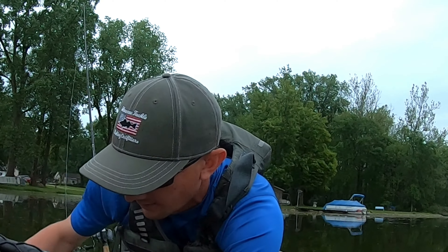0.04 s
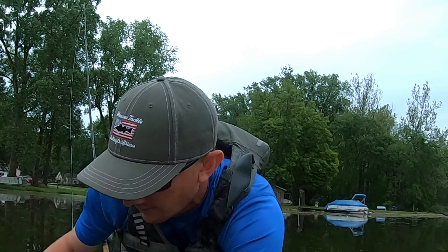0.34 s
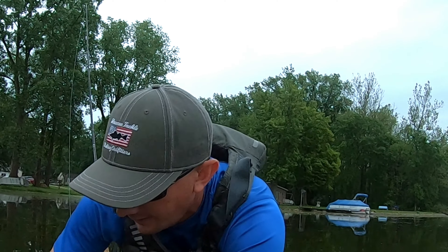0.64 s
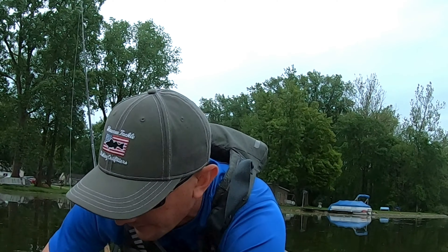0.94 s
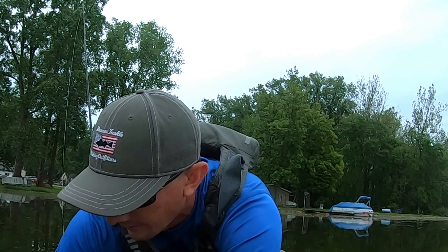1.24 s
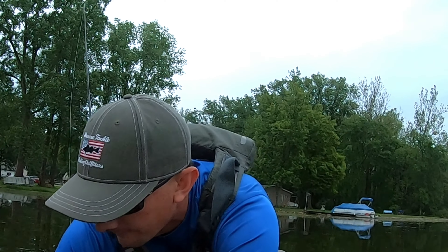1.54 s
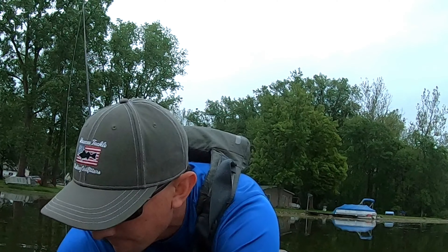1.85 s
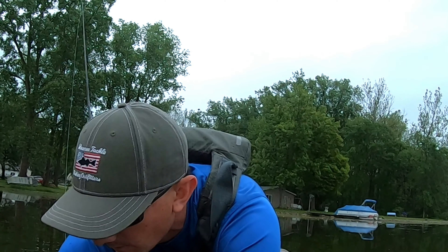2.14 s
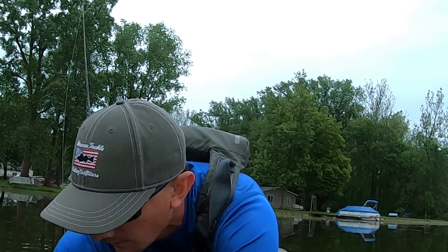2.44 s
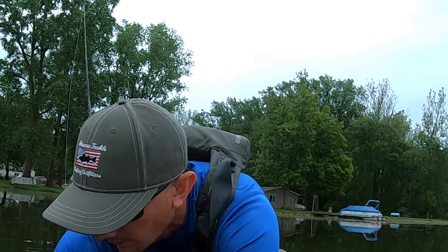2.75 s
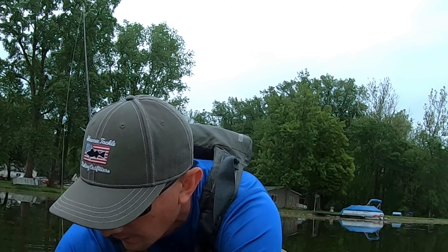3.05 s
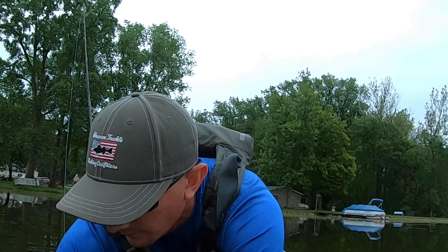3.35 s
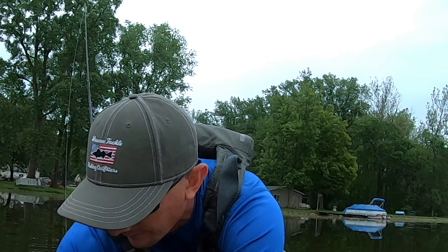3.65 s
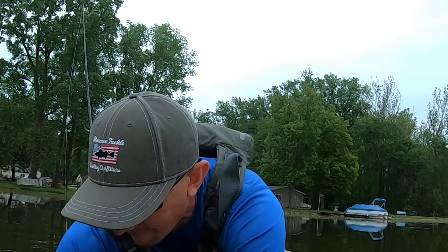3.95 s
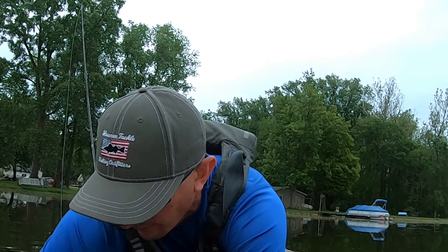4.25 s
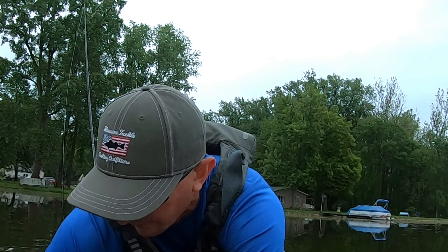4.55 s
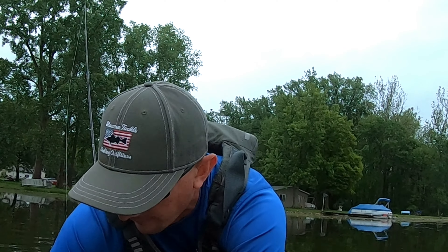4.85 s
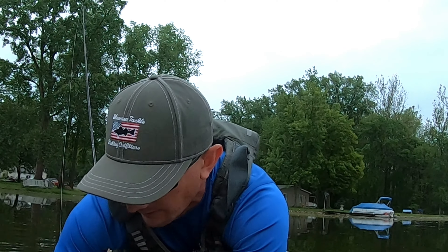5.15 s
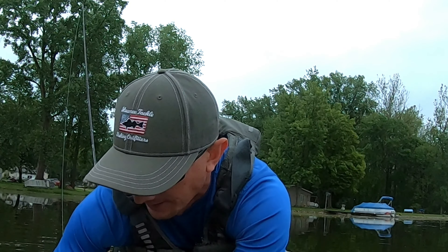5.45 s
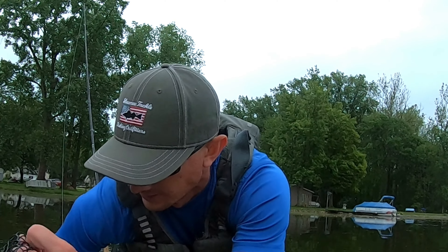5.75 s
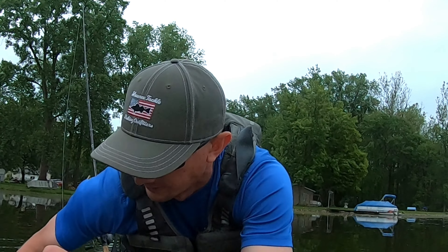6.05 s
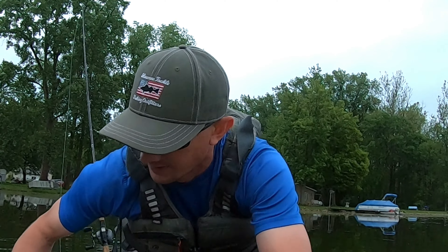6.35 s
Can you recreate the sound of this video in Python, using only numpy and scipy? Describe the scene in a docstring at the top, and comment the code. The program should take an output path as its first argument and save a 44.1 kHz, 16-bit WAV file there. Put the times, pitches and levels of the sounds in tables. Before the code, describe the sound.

A landing net bumps a plastic kayak with a hollow knock that shakes the microphone, and a fish splashes in the mesh. Water drips off while small birds chirp on the bank of a calm lake. The fish thrashes again amid more knocks, a bird trills, and a last few knocks come at the end. The boat and water are close, over a faint low drone.

```python
"""A fish is handled in a rubber landing net beside a plastic kayak on a calm lake, over a low far drone.
First the net frame knocks the hull, ringing its modes and shaking the camera mount; the fish splashes,
trapping air that rings as bubbles. Then the mesh drips while songbirds whistle from trees on
the left bank. Near 4 s the fish thrashes again amid more knocks, and trills follow. The net trickles
faintly, and a last cluster of knocks comes just after 6 s."""
import sys
import numpy as np
from scipy import signal
from scipy.fft import rfft, irfft, next_fast_len
from scipy.io import wavfile
from scipy.ndimage import map_coordinates

SR = 44100
rng = np.random.default_rng(int(sys.argv[2]) if len(sys.argv) > 2 else 0)


def persist_wave(psi):
    """Save psi, clipped to +-1, as 16-bit WAV."""
    counts = np.round(np.clip(psi, -1, 1) * 32767).astype(np.int16)
    wavfile.write(sys.argv[1], SR, np.atleast_2d(counts).T)


N = 282725
T = np.arange(N) / SR
TOP_HZ = 15200

# Levels are relative within each table; t60 is the time to decay by 60 dB.
# background spectra: (frequency [Hz], spectral level [dB])
RUMBLE_SPECTRUM = [(18, -30), (32, -18.5), (46, 8.5), (68, -5.5), (100, 0), (170, -32), (400, -120)]
DRONE_SPECTRUM = [(47, -32.5), (80, -4), (114, -21.5), (130, -1), (184, -2), (352, -16), (486, -22.5),
                  (966, -29.5), (1120, -38), (1680, -43.5), (2000, -39.5), (2600, -68), (4400, -120)]
CHORUS_SPECTRUM = [(880, -10), (1500, -8), (1820, -5), (2160, 3.5), (2700, -6.5), (3000, 7), (5720, -13),
                   (7500, -21), (9720, -30.5), (11200, -35.5), (15000, -52.5)]
# low rumble that swells with the hull knocks, with light wind between: (time [s], level [dB])
RUMBLE_LEVELS = [(0, -59.5), (.3, -36), (.7, -62.5), (1.2, -58), (1.75, -57), (2.5, -68), (2.95, -60.5),
                 (3.35, -50.5), (3.7, -54.5), (4.03, -56.5), (4.2, -40.5), (4.45, -59), (4.9, -83),
                 (5.3, -70), (5.9, -79), (6.41, -55)]
# envelopes of the far drone and distant birds: (time [s], level [dB])
DRONE_LEVELS = [(0, -51.5), (1.2, -56.5), (4.2, -53.5), (5.9, -54.5), (6.41, -46.5)]
CHORUS_LEVELS = [(0, -50), (.35, -61.5), (1.45, -55.5), (2.3, -59.5), (2.8, -53), (3.3, -58.5),
                 (4.15, -54.5), (4.5, -48), (4.8, -54), (5.65, -62), (6.1, -54), (6.41, -55.5)]
CHIRP_LEVELS = [(0, -63), (1.5, -55), (2.8, -54.5), (3.1, -61.5), (3.7, -54), (4.35, -59), (5, -57.5),
                (5.6, -62.5), (6.41, -56.5)]

# trills: (time [s], level [dB], rise [s], hold [s], t60 [s], top [Hz], bottom [Hz], note length [s])
BIRD_TRILLS = [(2.695, -61.5, 0.044, 0.04, .15, 8700, 6400, 0.024),
               (4.3, -42.5, 0.27, 0.4, 0.16, 3420, 2720, .018),
               (4.299, -52, 0.043, 0.32, 0.68, 5760, 5200, .012),
               (4.3, -42.5, 0.14, .12, 0.36, 4000, 2850, 0.011)]
# pace of each trill: (rate [notes/s])
NOTE_RATES = [55, 42.1, 32.1, 87]
# bird note contours by shape: (start pitch [ratio], middle [ratio], end [ratio], swell [exponent])
NOTE_SHAPES = {"swoop": (1.29, 0.98, 1, 0.22), "fall": (1.13, 1, .9, 0.32), "droop": (1.18, 1, 0.96, 0.17),
               "rise": (0.945, 0.99, 1.075, 0.14), "arch": (.81, 0.93, 1.02, 0.34),
               "level": (0.95, 1, 1.01, 0.19), "thin": (1.025, 0.99, .975, .4),
               "sigh": (1.035, 1, .975, 3.5)}
# single bird notes: (time [s], length [s], shape, pitch [Hz], level [dB])
SONG_NOTES = [(0, 0.039, "droop", 2957, -44), (1.033, 0.082, "swoop", 2654, -47.5),
              (1.185, 0.057, "fall", 3065, -48), (1.354, 0.051, "fall", 2750, -51.5),
              (1.603, 0.025, "fall", 3214, -44.5), (1.674, 0.026, "arch", 2460, -49.5),
              (1.782, 0.033, "thin", 6080, -62.5), (1.815, 0.031, "fall", 4410, -59),
              (2.127, 0.057, "thin", 5800, -65), (2.241, 0.033, "thin", 3440, -50.5),
              (2.289, 0.033, "thin", 3100, -50), (2.278, 0.04, "thin", 2374, -47.5),
              (2.499, 0.029, "fall", 3090, -53), (2.604, 0.071, "level", 2926, -42),
              (2.68, 0.14, "rise", 2582, -44.5), (2.821, 0.035, "thin", 3570, -54.5),
              (2.837, 0.071, "fall", 4180, -64), (3.235, 0.056, "arch", 3066, -46),
              (3.265, .065, "droop", 2540, -46), (3.389, 0.051, "rise", 2324, -52.5),
              (3.498, 0.03, "thin", 3880, -51), (3.59, 0.067, "thin", 3690, -55.5),
              (3.518, 0.055, "thin", 3230, -45), (3.79, 0.049, "fall", 2780, -53),
              (4.357, 0.056, "fall", 2340, -55), (4.7, 0.089, "level", 2115, -55),
              (5.529, .06, "fall", 2540, -61.5), (5.021, 0.033, "droop", 2530, -49.5),
              (5.137, 0.057, "fall", 3160, -46.5), (5.907, 0.098, "fall", 3160, -50.5),
              (5.827, 0.25, "thin", 5790, -71), (5.928, 0.3, "sigh", 5530, -57.5),
              (6.064, 0.043, "level", 2470, -51.5), (6.019, 0.053, "arch", 3030, -49.5),
              (6.054, .04, "thin", 3900, -54), (6.09, 0.038, "rise", 3070, -52),
              (6.165, 0.051, "rise", 2395, -57.5)]
# notes of a down-slurred call: (delay [s], length [s], shape, pitch [Hz], level [dB])
SLUR_NOTES = [(0, 0.0407, "swoop", 2502, 2.5), (0.033, 0.15, "droop", 2150, -9.5),
              (0.035, .024, "fall", 2800, -2.5), (.17, 0.202, "thin", 2028, -18.5)]
# repeats of that call: (time [s], level [dB])
SLUR_CALLS = [(1.505, -46), (2.102, -45.5)]

# water spectra: (frequency [Hz], gain [dB])
SLOSH_SPECTRUM = [(150, -15), (250, -12), (311, -5.5), (452, -7), (498, -7.5), (946, -4.5), (1550, -2),
                  (3290, 3), (4500, -29), (5850, -52), (9900, -120)]
SPRAY_SPECTRUM = [(1500, -22), (3000, -4.5), (3900, -9), (5800, -15), (7400, -12.5), (8500, -22),
                  (10000, -24), (13000, -32.5), (15500, -46)]
FOAM_SPECTRUM = [(2500, -12), (6500, -8.5), (9300, -15), (12500, -23.5), (15000, -46)]
TICK_SPECTRUM = [(900, -23), (2500, 7), (4000, 5), (7400, 4.5), (8500, -14), (12000, -21.5), (15000, -37.5)]
# short, sharp ticks of tiny drips and bubbles: (time [s], level [dB], added tilt [dB/octave], t60 [s])
DRIP_TICKS = [(0.2, -42, 7, 0.029), (0.47, -39.5, -5.5, 0.049), (0.653, -49, -11, 0.027),
              (0.968, -34, 0, 0.032), (1.076, -47.5, 20, 0.022), (1.2603, -36, 1.5, 0.018),
              (1.365, -38, -2, 0.011), (1.388, -41, -8.5, 0.025), (1.509, -46, 6, .01),
              (2.059, -51, -4, 0.021), (2.546, -45.5, -3, 0.01), (2.606, -47, -14, 0.016),
              (3.764, -49, -9, 0.034), (3.802, -50, -1, .012), (4.266, -37.5, 1, 0.012),
              (4.297, -29, -9, 0.017), (4.389, -40, -6, 0.018), (4.4047, -39, -6, 0.026),
              (4.5, -38, -8, 0.019), (4.972, -43.5, -10.5, 0.022), (5.389, -50.5, -5.5, 0.049),
              (6.007, -52, 21, 0.014), (6.05, -46.5, -7.5, 0.046), (6.25, -47, -11, .025),
              (6.273, -50.5, 25, 0.032), (6.303, -54, 26, .03)]
# trickles from the lifted net: (time [s], level [dB], rise [s], hold [s], t60 [s])
NET_TRICKLES = [(0.43, -52.5, 0.11, 0.5, 1.82), (3.685, -61.5, 0.25, 0.31, 1.3),
                (4.906, -72, 0.16, 0.41, 1)]
# foam after the long splash: (time [s], level [dB], rise [s], hold [s], t60 [s]); negative rise is abrupt
FOAM_BURST = (0.98, -64, -0.05, 0.25, 3.5)
# drops and slaps of water: (time [s], level [dB], bubble pitch [Hz], t60 [s], left over right [dB])
WATER_DROPS = [(0.174, -35, 1555, .04, 0), (0.208, -28.5, 1550, 0.033, -4), (0.2134, -23, 826, 0.021, -1),
               (0.2382, -28.5, 1770, 0.023, 5), (.273, -27, 930, 0.014, -6),
               (0.2725, -26.5, 1470, 0.014, -4), (0.313, -37, 1590, 0.054, -4.5),
               (0.4166, -34, 920, 0.028, -1), (0.4411, -39.5, 670, 0.073, 2),
               (0.4726, -35, 2610, 0.031, -3), (0.485, -35, 1120, 0.022, 4), (0.5017, -33, 850, 0.072, -2),
               (0.6185, -27.5, 2410, 0.021, 1), (0.6192, -33.5, 1100, 0.026, 6),
               (.634, -33.5, 680, 0.047, 0), (0.6542, -23, 1004, 0.022, 7), (0.655, -30.5, 241, 0.19, 0),
               (0.664, -29.5, 2320, 0.032, 2), (.766, -29.5, 1760, 0.025, -5),
               (.8016, -27.5, 784, 0.04, -13), (.8664, -28, 734, 0.027, 0),
               (0.8931, -18.5, 2460, 0.011, 0.5), (.942, -32, 1900, 0.027, -2),
               (1.042, -24, 1230, 0.027, -2), (1.478, -42.5, 1150, 0.019, -2.5),
               (2.684, -46.5, 1500, 0.021, -2), (3.422, -43, 1700, 0.011, -6),
               (3.851, -37.5, 1540, 0.043, 3), (3.981, -40.5, 1440, 0.035, -4),
               (4.054, -39.5, 2560, 0.023, -3), (4.075, -34, 1890, 0.071, -2),
               (4.086, -11.5, 1340, .009, -1.5), (4.139, -29, 1000, 0.036, -2),
               (4.161, -17, 610, 0.013, -5), (4.175, -23, 1670, 0.017, -11), (4.253, -34, 1080, 0.028, -3),
               (4.2662, -24, 880, 0.038, -3), (4.2944, -26.5, 1860, 0.026, -7),
               (4.408, -40.5, 1640, 0.022, 0.5), (4.413, -36, 2460, 0.031, 7), (4.56, -43, 1990, .02, 0),
               (5.036, -46.5, 620, 0.062, -5), (5.188, -42.5, 1125, 0.028, -6),
               (5.2645, -43.5, 1070, 0.042, -8)]
# the fish thrashes and stirs: (time [s], slosh level [dB], spray level [dB], rise [s], hold [s], t60 [s])
THRASHES = [(0.117, -46, -58.5, 0.0055, 0.097, 3.4), (0.196, -40, -47.5, 0.005, 0.0067, 0.076),
            (0.561, -50, -58.5, 0.047, 0.034, 0.22), (0.639, -37.5, -44.5, 0.016, 0.0019, 0.085),
            (0.741, -43, -53.5, 0.034, 0.23, 0.65), (0.779, -41.5, -78, 0.023, 0.0044, 0.068),
            (3.692, -63, -75.5, 0.021, 0.29, 0.23), (4.065, -41.5, -55, 0.019, 0.16, 0.46),
            (4.158, -40.5, -46.5, 0.012, 0.019, 0.085), (4.233, -45, -52, 0.023, 0.005, 0.16),
            (5.32, -63, -78.5, 0.035, 0.95, 0.35), (6.251, -56, -53, 0.0024, .004, 0.23)]
# mount sway after hard blows: (time [s], level [dB], rise [s], hold [s], t60 [s])
MOUNT_SWAYS = [(0.136, -26.5, 0.016, 0.14, 0.076), (0.35, -36, 0.024, 0.017, 1),
               (4.148, -37, 0.022, 0.17, 0.29), (4.496, -44, 0.11, 0.059, 0.1)]
# modes of the hollow hull: (frequency [Hz], level [dB], t60 [s])
HULL_MODES = [(89.7, 3.5, 0.61), (134, 6.5, 0.22), (162.6, -3, 0.53), (190.7, 5, 0.18), (253, -2, 0.21),
              (323, 1, 0.12), (452.5, 0.5, 0.12), (562, -5.5, 0.087), (667, 6.5, 0.043), (777, -12.5, 0.28),
              (1140, -31, 0.078), (1280, -22, .05), (1570, -29, 0.03)]
# blows on the hull: (time [s], level [dB], band centre [Hz], scuff t60 [s])
HULL_BLOWS = [(0.1282, -21.5, 400, 0.14), (0.1333, -14, 135, 0.045), (0.14, -29.5, 455, 0.037),
              (0.651, -55, 258, 0.021), (2.622, -38.5, 72.4, 0.74), (4.137, -37, 355, .14),
              (4.158, -26.5, 300, 0.087), (4.175, -34, 600, 0.13), (4.184, -29, 206, 0.1),
              (4.223, -30, 136, 0.049), (4.312, -39.5, 210, .08), (4.509, -34.5, 133, 0.095),
              (6.254, -43, 617, 0.064), (6.274, -37.5, 237, 0.043), (6.303, -40.5, 750, 0.04),
              (6.312, -36, 280, 0.31), (6.324, -30.5, 900, 0.074), (6.334, -25, 235, 0.029)]


def amp(db):
    """Decibels to amplitude ratio."""
    return 10 ** (np.asarray(db) / 20)


def unit(x):
    """Normalisation to rms 1."""
    return x / np.sqrt(np.mean(x ** 2) + 1e-20)


def fade(t, t60):
    """Exponential decay of a damped vibration."""
    return np.exp(-np.log(1000) * t / max(t60, 1e-4))


def curve(rows):
    """Gain envelope interpolated through (time [s], level [dB]) points."""
    return amp(np.interp(T, *np.transpose(rows)))


def burst(s, db, rise, hold, t60):
    """Transient envelope: linear rise, hold, exponential decay."""
    onset = np.clip((T - s) / max(rise, 1e-3), 0, 1)
    return amp(db) * onset * fade(np.maximum(T - s - rise - hold, 0), t60)


def wobble(rate):
    """Smooth random modulation, with rate knots a second."""
    return map_coordinates(rng.standard_normal(int(N * rate / SR) + 4), [T * rate])


def add(bus, s, x):
    """Superposition of x on the bus at time s."""
    i = max(round(s * SR), 0)
    bus[..., i:i + x.shape[-1]] += x[..., :max(N - i, 0)]


def place(pan_db):
    """Constant-power panning; positive is to the left."""
    return unit(amp([[pan_db / 2], [-pan_db / 2]]))


def filtered(x, response):
    """Linear filtering: the spectrum of x times a frequency response."""
    n = x.shape[-1]
    padded = next_fast_len(n + 8192)
    return irfft(rfft(x, padded) * response(np.fft.rfftfreq(padded, 1 / SR)), padded)[..., :n]


def coloured(x, spectrum):
    """Spectral shaping by (frequency [Hz], gain [dB]) points, at rms 1."""
    f, db = np.transpose(spectrum)
    return unit(filtered(x, lambda hz: amp(np.interp(np.log(hz + 1), np.log(f), db))))


def noise(side_db, size=N):
    """Stereo white noise; the side-to-mid ratio sets its coherence."""
    mid, side = rng.standard_normal((2, size))
    return unit(np.array([mid + amp(side_db) * side, mid - amp(side_db) * side]))


def bubbles(count, centre_hz, spread, cycles, scatter_db, width_db):
    """Bubble resonance: a cloud of random damped sines, each falling 60 dB over the given cycles."""
    start = rng.integers(0, N, count)
    pitch = centre_hz * np.exp(spread * rng.standard_normal(count))
    strength = amp(scatter_db * np.minimum(rng.exponential(size=count), 3))
    pan_db = width_db * rng.standard_normal((count, 1))
    age = np.arange(800)  # samples
    turns = np.minimum(pitch, TOP_HZ)[:, None] * age / SR
    rings = strength[:, None] * np.sin(2 * np.pi * turns) * fade(turns, cycles)
    indices = (start[:, None] + age).ravel()
    return np.array([np.bincount(indices, (rings * amp(side * pan_db / 2)).ravel(), N)[:N]
                     for side in (1, -1)])


def lake():
    """Modulated noise: a low rumble swelling with the knocks, a far drone and a blur of distant birds."""
    unrest = amp(8 + 1.2 * wobble(6.2))
    rumble = unrest * curve(RUMBLE_LEVELS) * coloured(noise(0.28), RUMBLE_SPECTRUM)
    drone = amp(2 + wobble(6.48)) * curve(DRONE_LEVELS) * coloured(noise(-9), DRONE_SPECTRUM)
    chorus = amp(-4 + wobble(11)) * curve(CHORUS_LEVELS) * coloured(noise(-1.1), CHORUS_SPECTRUM)
    return rumble * place(-1.4) + drone + chorus * place(0.68)


def tree_scatter(song, t60, wet_db, pan_db, build_s=0.018, cutoff_hz=4800):
    """Scattering among trees: a duller reverberation builds up behind the direct song."""
    t = np.arange(SR) / SR
    tail = noise(0, SR) * fade(t, t60) * np.tanh(t / build_s)
    echo = signal.fftconvolve(song[None], tail / np.linalg.norm(tail[0]), axes=1)[:, :N]
    echo = filtered(echo, lambda hz: 1 / np.hypot(1, (hz / cutoff_hz) ** 2))
    direct = np.array([np.roll(song, 20), song])  # the microphone ports hear it slightly out of step
    return direct * place(pan_db) + amp(wet_db) * echo * place(3.5)


def trill(row, rate):
    """Repeated frequency sweeps: short, slightly uneven falling notes, raspier in the higher trills."""
    *envelope, top_hz, bottom_hz, note_s = row
    note_age = (T - envelope[0] + 0.0016 * wobble(15)) % (1 / rate)
    progress = np.minimum(note_age / note_s, 1)
    jitter = 1 + top_hz / 170000 * wobble(900) + 0.018 * wobble(30)
    pitch = (top_hz + (bottom_hz - top_hz) * progress) * jitter
    pulses = np.sin(np.pi * progress) ** 2 * amp(wobble(30))
    return burst(*envelope) * pulses * np.sin(2 * np.pi * np.cumsum(pitch) / SR)


def whistle(length, pitches, rasp, swell=0.7, flutter_db=1.5):
    """Frequency modulation: a glide through three pitches, warbled by rasp; swell softens its ends."""
    progress = np.linspace(0, 1, max(int(length * SR), 2))
    drift, flutter = (map_coordinates(knots, [progress * length * 190], mode="mirror")
                      for knots in rng.standard_normal((2, 100)))
    glide = np.polyval(np.polyfit([0, 0.5, 1], pitches, 2), progress)
    phase = 2 * np.pi * np.cumsum(glide * (1 + rasp * drift)) / SR
    envelope = amp(flutter_db * flutter) * np.abs(np.sin(np.pi * progress)) ** swell
    return envelope * np.sin(phase)


def birds():
    """Superposed gliding tones: nearer singers over quick chirps from farther along the shore."""
    near, far = np.zeros((2, N))
    slurs = [(s + lag, length, shape, hz, db + note_db)
             for s, db in SLUR_CALLS for lag, length, shape, hz, note_db in SLUR_NOTES]
    for s, length, shape, hz, db in slurs + SONG_NOTES:
        *glide, swell = NOTE_SHAPES[shape]
        pitches = hz * np.array(glide)
        # low and very high notes are clear, those between them hoarse
        rasp = np.interp(pitches[0], [2800, 3300, 4800, 5500], [0.004, 0.045, 0.045, 0.002])
        add(near, s, amp(db) * whistle(length, pitches, rasp, swell))
    for when, height, span, slope in rng.random(size=(270, 4)):
        hz = 2400 * 2.3 ** height
        glide = 1 + (0.18 * slope - 0.04) * np.array([1, -0.15, -1])
        chirp = whistle(0.025 + 0.045 * span, hz * glide, rasp=0.016)
        add(far, when * N / SR, amp(-16 * height) * chirp)
    return near + far * curve(CHIRP_LEVELS)


def drip_ticks(rise_s=0.00065):
    """Brief events have broad spectra: tiny drips and bubbles tick in short bursts of noise."""
    out, t = np.zeros((2, N)), np.arange(SR // 15) / SR
    for s, db, tilt, t60 in DRIP_TICKS:
        spectrum = [(hz, level + tilt * np.log2(hz / 1000)) for hz, level in TICK_SPECTRUM]
        envelope = fade(t, t60) * (1 - np.exp(-t / rise_s))
        add(out, s, amp(db) * coloured(noise(-1.6, len(t)), spectrum) * envelope)
    return out


def trickle():
    """Air entrainment: water running off the net makes sparse ringing bubbles."""
    cloud = bubbles(count=1100, centre_hz=1461, spread=0.556, cycles=25, scatter_db=2.5, width_db=10)
    flow = amp(-76.5) + sum(burst(*row) for row in NET_TRICKLES)
    return flow * coloured(cloud, SLOSH_SPECTRUM)


def foam():
    """Small bubbles resonate high: foam fizzes out after the long splash."""
    cloud = bubbles(count=9000, centre_hz=6900, spread=0.33, cycles=49, scatter_db=1.5, width_db=14)
    return burst(*FOAM_BURST) * coloured(unit(cloud) + noise(0), FOAM_SPECTRUM)


def drops(climb=0.15, attack_s=0.00042, slap_db=-8):
    """Impact, then resonance: a drop slaps the water and traps a bubble whose pitch climbs as it dies."""
    out, t = np.zeros((2, N)), np.arange(SR // 10) / SR
    for s, db, hz, t60, pan_db in WATER_DROPS:
        ring = np.sin(2 * np.pi * hz * t * (1 + climb * t / t60 / 2)) * fade(t, t60)
        spectrum = [(hz / 4, -22), (hz, 0), (hz * 2, -8), (hz * 10, -60)]
        slap = coloured(noise(-17, len(t)), spectrum) * fade(t, 0.55 * t60)
        drop = (ring + amp(slap_db) * slap) * np.tanh(t / attack_s) ** 2
        add(out, s, amp(db - 0.5) * place(pan_db) * drop)
    return out


def splashes(churn_db=1.27):
    """Air entrainment: each thrash churns up bubbles under a finer spray and a spatter of droplets."""
    churn = amp(churn_db * wobble(55))
    slosh_gain = churn * sum(burst(s, db, *shape) for s, db, _, *shape in THRASHES)
    spray_gain = churn * sum(burst(s, db, *shape) for s, _, db, *shape in THRASHES)
    large = bubbles(count=6000, centre_hz=994, spread=0.588, cycles=22.8, scatter_db=1.5, width_db=8)
    slosh = amp(0.27) * coloured(unit(large) + amp(-4) * noise(-16), SLOSH_SPECTRUM)
    small = bubbles(count=6000, centre_hz=5940, spread=0.348, cycles=49, scatter_db=3, width_db=1)
    fizz = amp(2) * coloured(unit(small) + amp(3) * noise(0), SPRAY_SPECTRUM)
    droplets = bubbles(count=900, centre_hz=3600, spread=0.55, cycles=6, scatter_db=4, width_db=6)
    spatter = amp(-3) * coloured(droplets, SPRAY_SPECTRUM)
    return slosh_gain * slosh * place(-3) + spray_gain * (fizz + spatter) * place(-2)


def mount_shudder(sway_hz=66, waver=0.0404, unsteady_db=3):
    """Vibration at the lowest mode: the camera mount sways and drives the two ports in antiphase."""
    phase = 2 * np.pi * np.cumsum(sway_hz * (1 + waver * wobble(19))) / SR
    sway = np.sin(phase) + amp(-23) * np.sin(2 * phase) + amp(-25.5) * np.sin(3 * phase)
    envelope = amp(14 + unsteady_db * wobble(24.93)) * sum(burst(*row) for row in MOUNT_SWAYS)
    return envelope * sway * np.array([[-0.24], [1]])


def hull_knocks(port_phase_rad=0.5, band_ratio=1.515, attack_s=0.00031):
    """Modal resonance: each blow of the net frame rings a band of the hull's modes and scuffs its skin."""
    out, t = np.zeros((2, N)), np.arange(SR // 2) / SR
    hz, mode_db, _ = np.transpose(HULL_MODES)
    ports = port_phase_rad * np.array([[1], [-1]])  # sound through the mount reaches them out of step
    rings = np.array([np.sin(2 * np.pi * f * t + ports) * fade(t, t60) for f, _, t60 in HULL_MODES])
    for s, db, centre_hz, scuff_t60 in HULL_BLOWS:
        low_hz, high_hz = centre_hz / band_ratio, centre_hz * band_ratio
        rolloff = np.hypot(1, (hz / high_hz) ** 2) * np.hypot(1, (low_hz / hz) ** 4)
        strengths = amp(mode_db + rng.standard_normal(len(hz))) / rolloff
        band = signal.butter(3, [low_hz, high_hz], "band", fs=SR, output="sos")
        scuff = unit(signal.sosfilt(band, noise(-1, len(t)))) * fade(t, scuff_t60)
        blow = amp(-7.5) * np.tensordot(strengths, rings, 1) + scuff
        add(out, s, amp(db) * blow * np.tanh(t / attack_s) ** 2)
    return out * place(-1.8)


def scene():
    """Superposition: boat and water close by, birds on the bank, trills from deeper in the trees."""
    trills = amp(-1.5) * sum(trill(row, rate) for row, rate in zip(BIRD_TRILLS, NOTE_RATES))
    deep_song = tree_scatter(trills, t60=0.8, wet_db=-2, pan_db=6)
    boat = hull_knocks() + mount_shudder()
    water = splashes() + drops() + drip_ticks() + trickle() + foam()
    bank_song = tree_scatter(birds(), t60=1.32, wet_db=-3, pan_db=10)
    return lake() + deep_song + bank_song + water + boat


def record(dry):
    """Band limiting: the camera passes nothing above TOP_HZ."""
    return filtered(dry, lambda hz: hz < TOP_HZ)


dry = scene()
out = record(dry)
persist_wave(out)
```